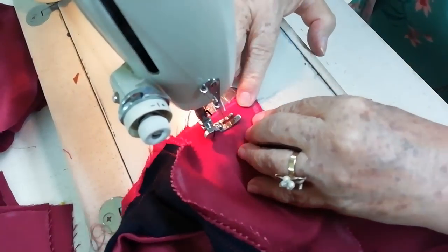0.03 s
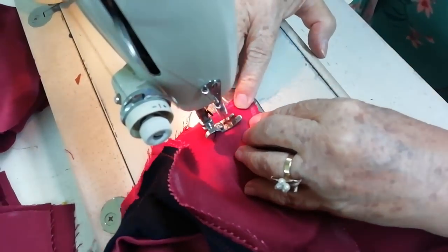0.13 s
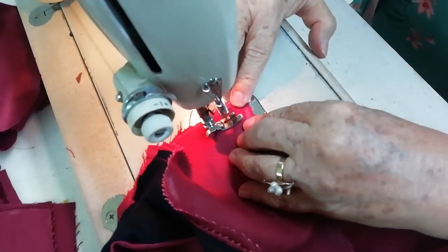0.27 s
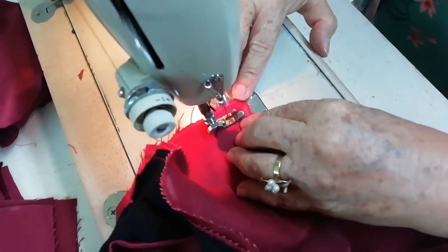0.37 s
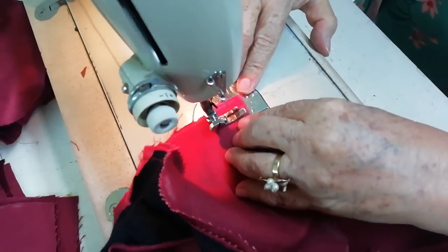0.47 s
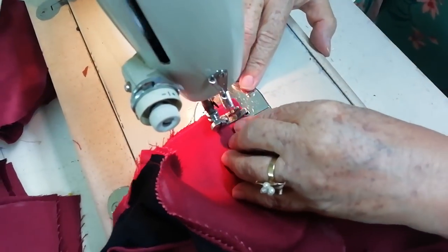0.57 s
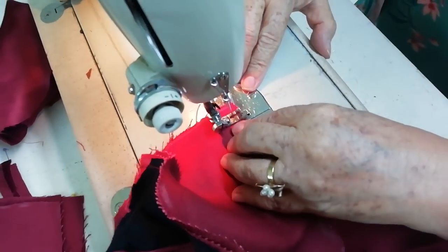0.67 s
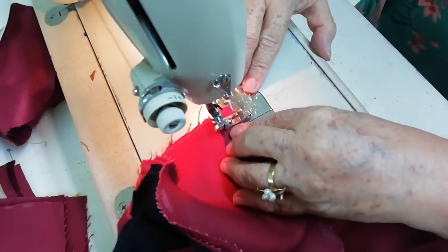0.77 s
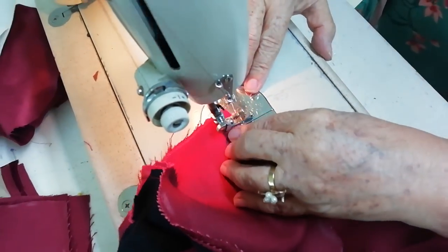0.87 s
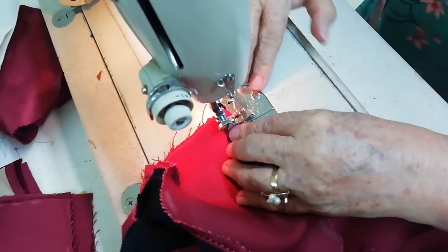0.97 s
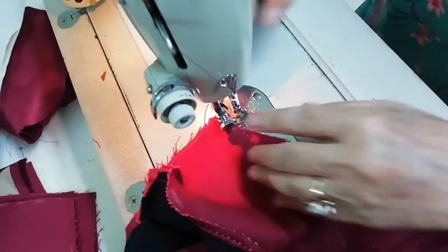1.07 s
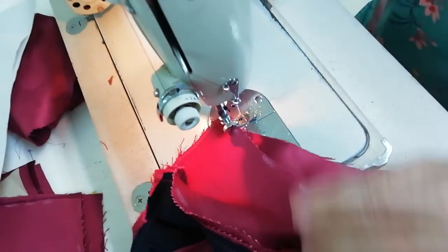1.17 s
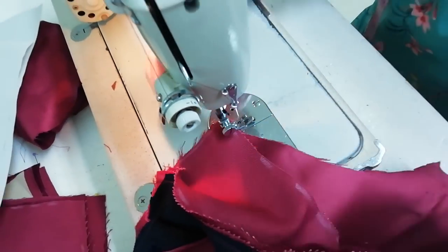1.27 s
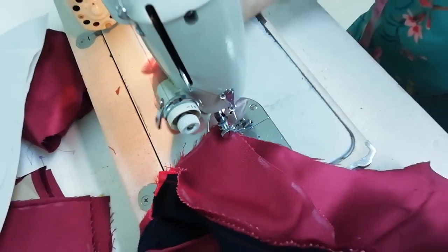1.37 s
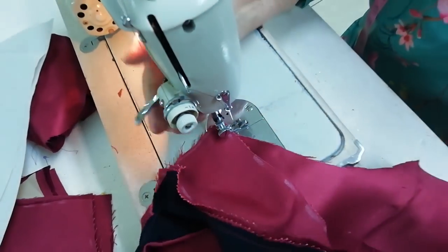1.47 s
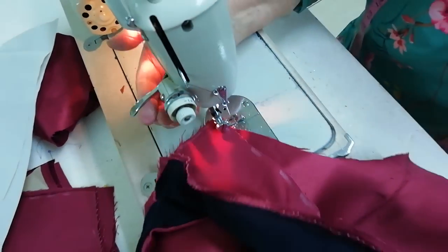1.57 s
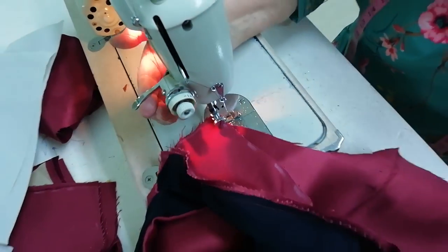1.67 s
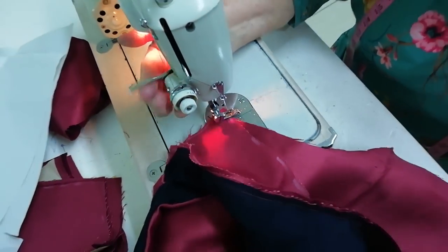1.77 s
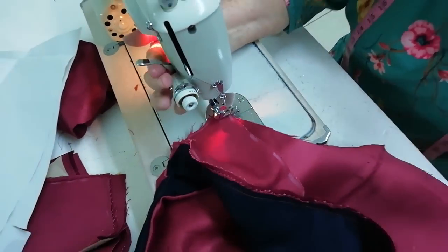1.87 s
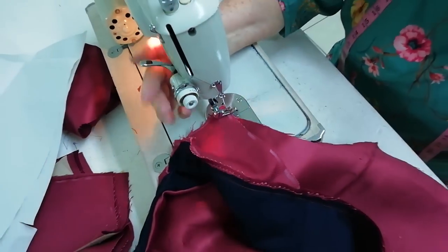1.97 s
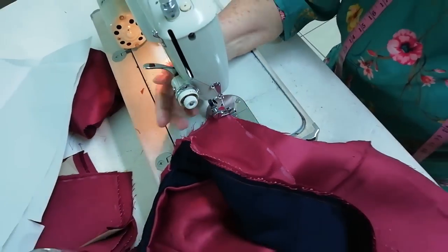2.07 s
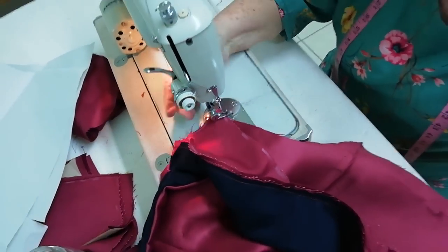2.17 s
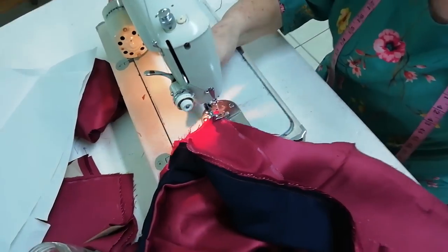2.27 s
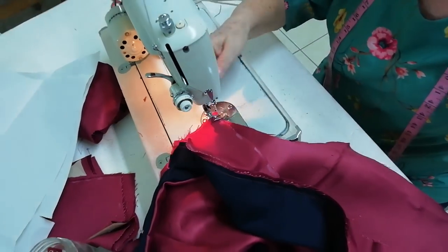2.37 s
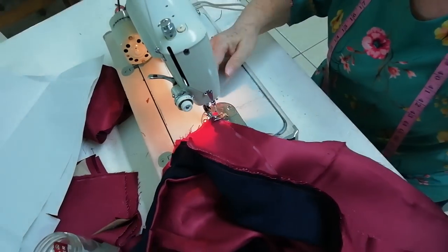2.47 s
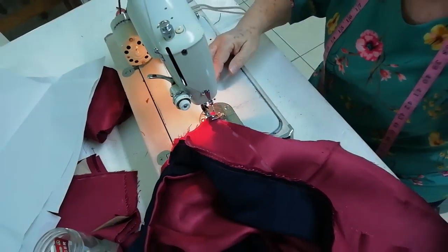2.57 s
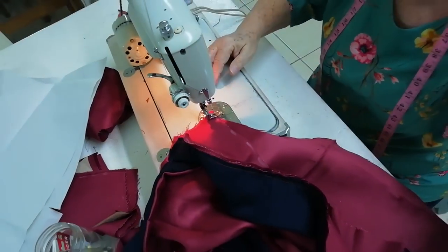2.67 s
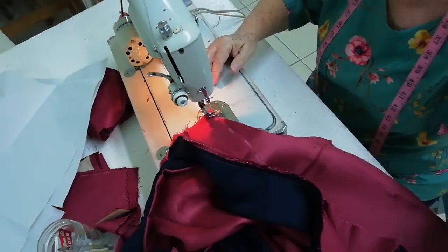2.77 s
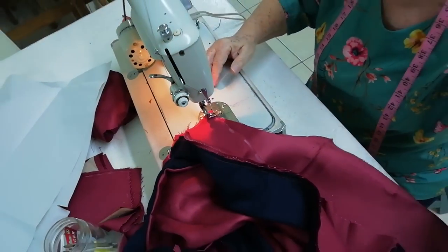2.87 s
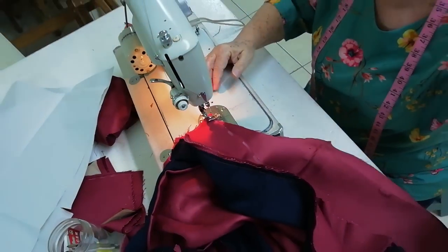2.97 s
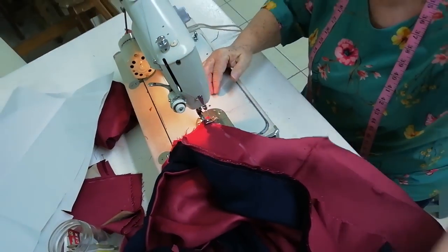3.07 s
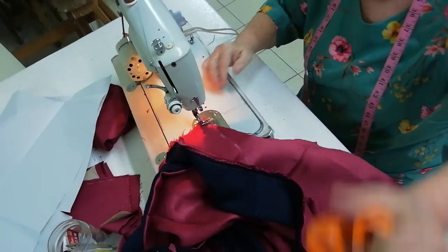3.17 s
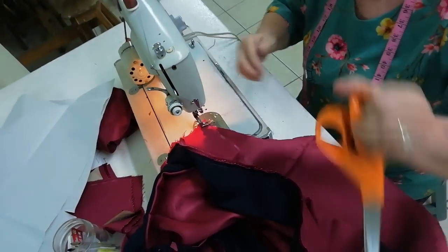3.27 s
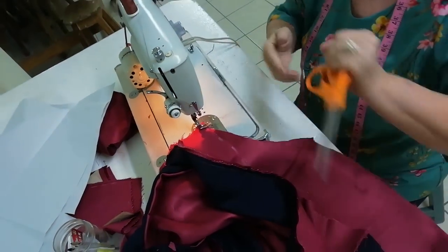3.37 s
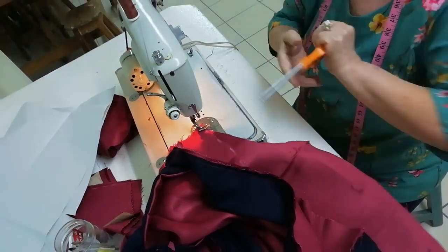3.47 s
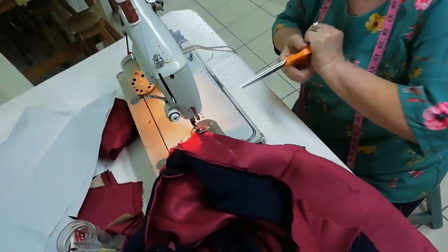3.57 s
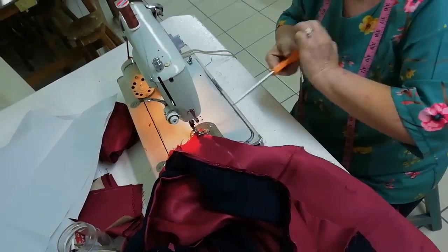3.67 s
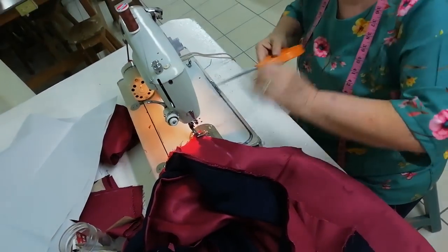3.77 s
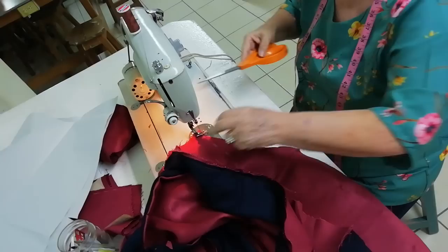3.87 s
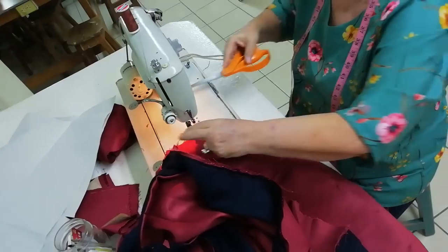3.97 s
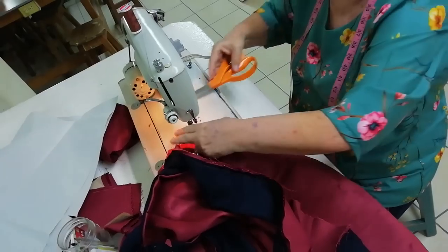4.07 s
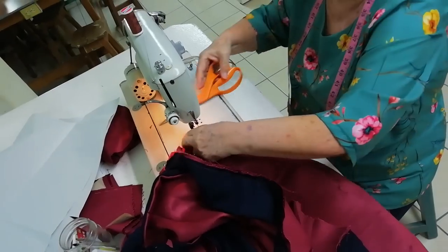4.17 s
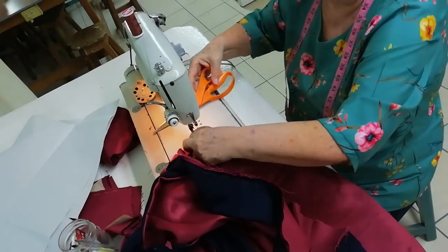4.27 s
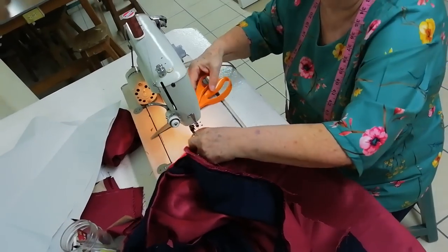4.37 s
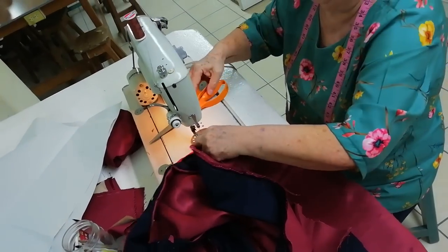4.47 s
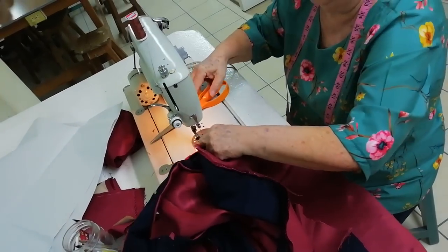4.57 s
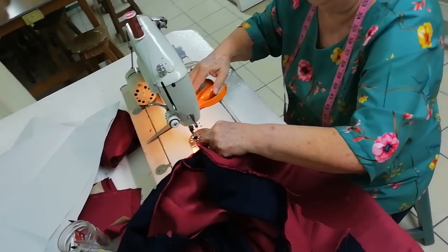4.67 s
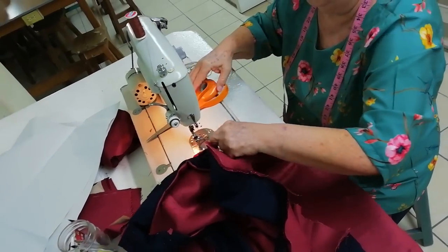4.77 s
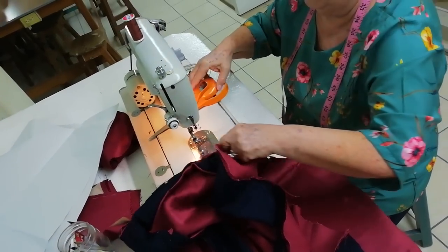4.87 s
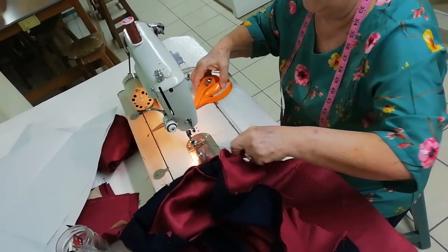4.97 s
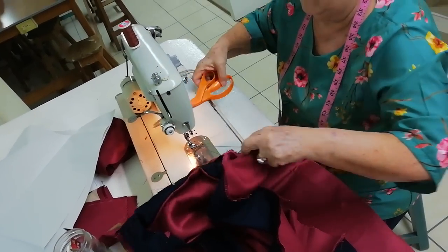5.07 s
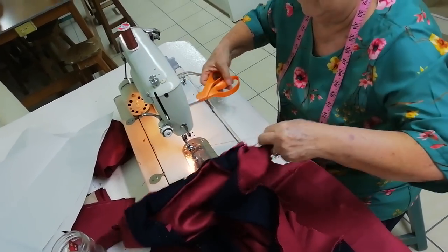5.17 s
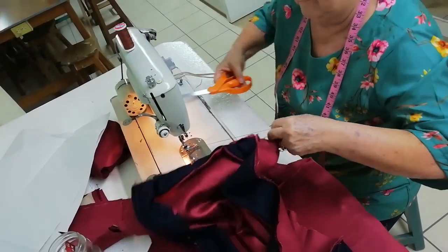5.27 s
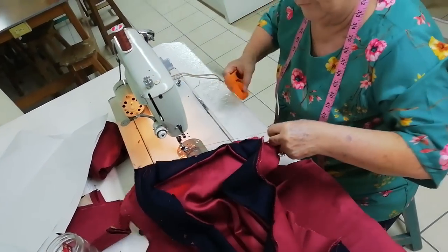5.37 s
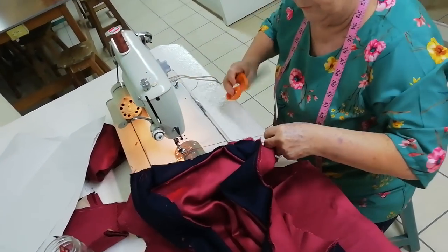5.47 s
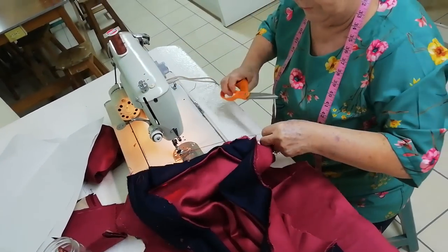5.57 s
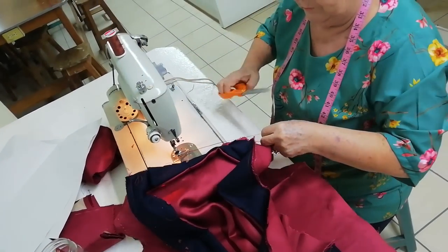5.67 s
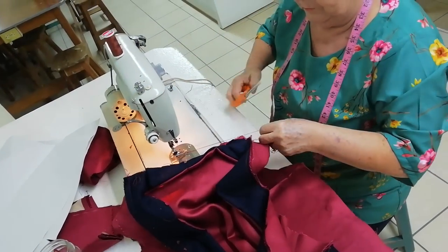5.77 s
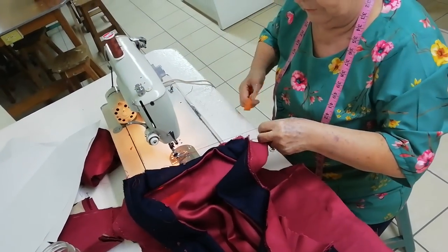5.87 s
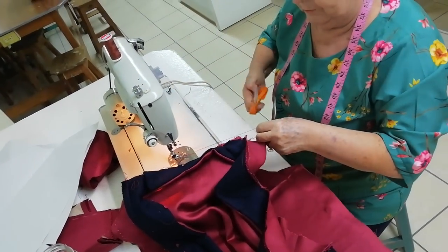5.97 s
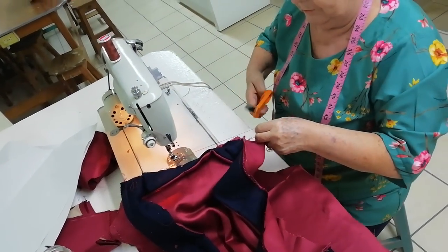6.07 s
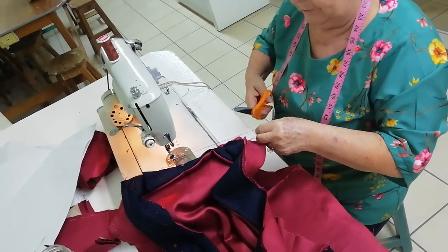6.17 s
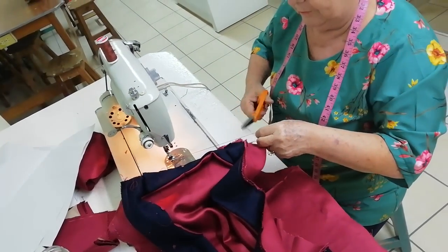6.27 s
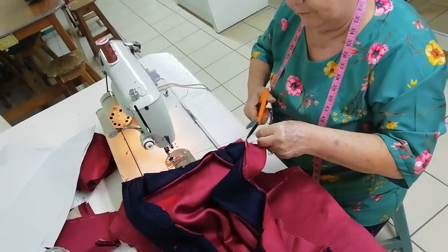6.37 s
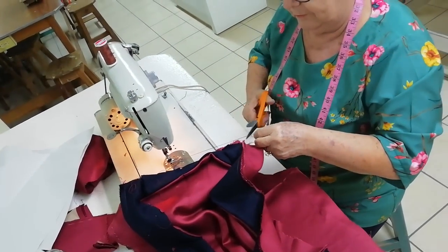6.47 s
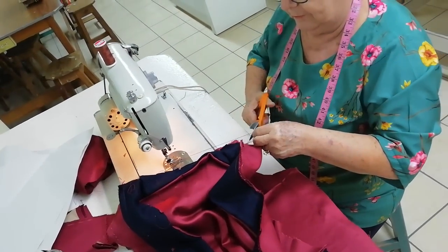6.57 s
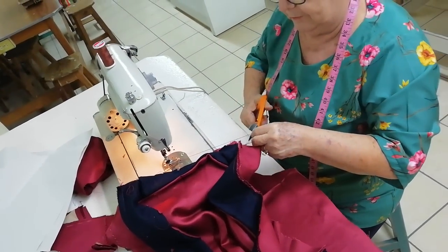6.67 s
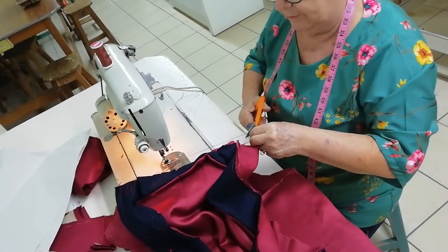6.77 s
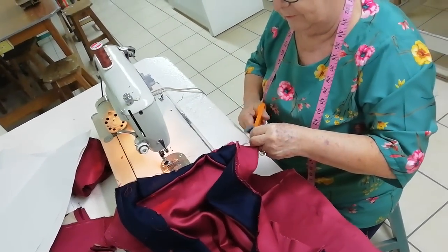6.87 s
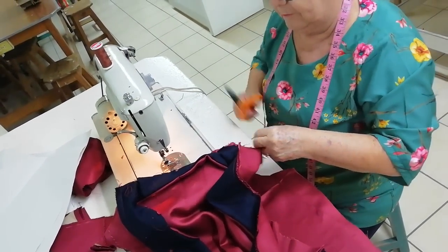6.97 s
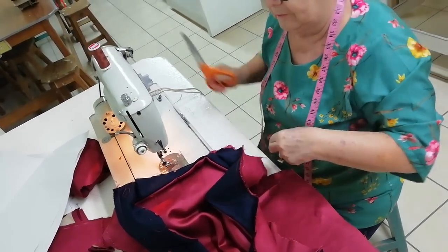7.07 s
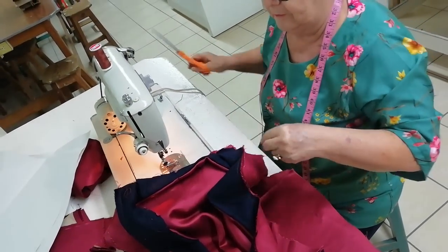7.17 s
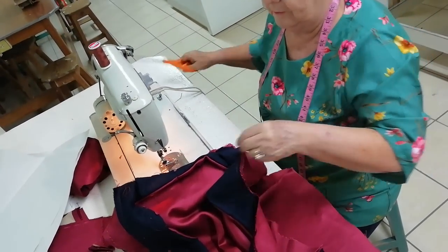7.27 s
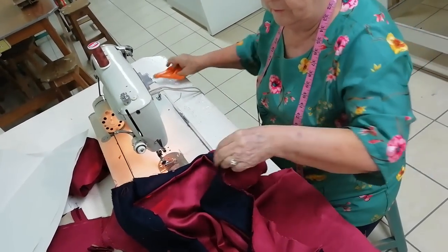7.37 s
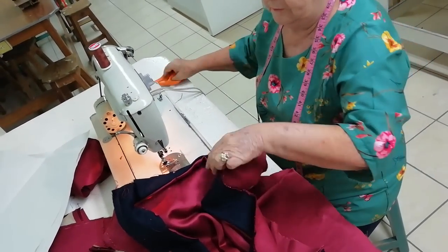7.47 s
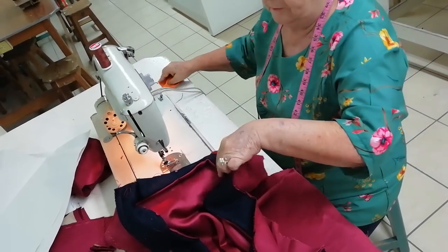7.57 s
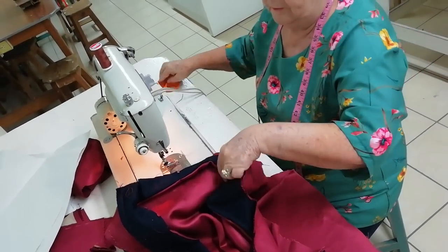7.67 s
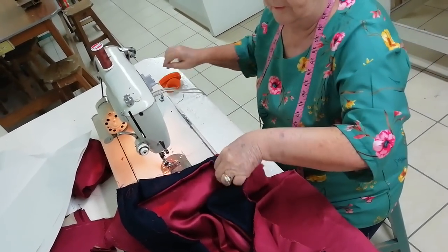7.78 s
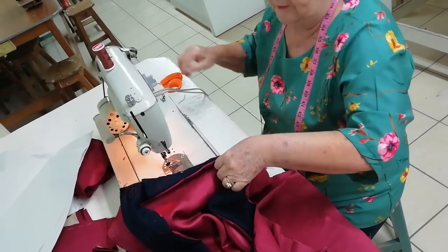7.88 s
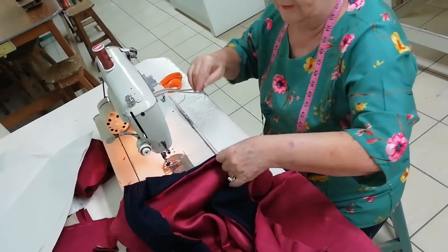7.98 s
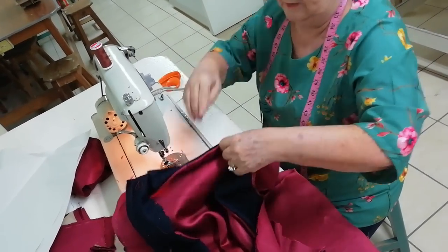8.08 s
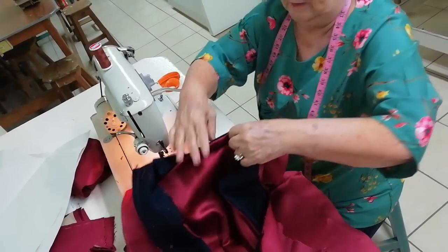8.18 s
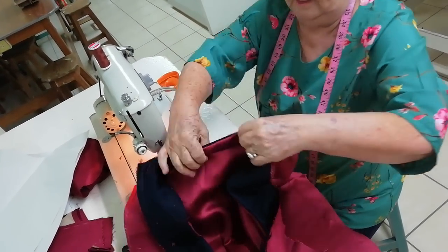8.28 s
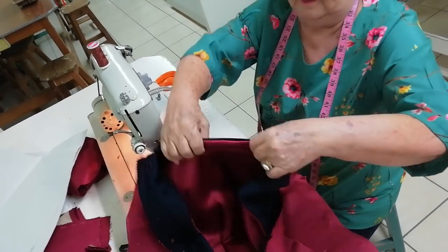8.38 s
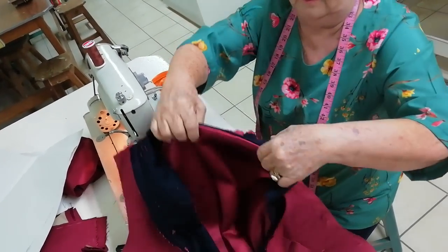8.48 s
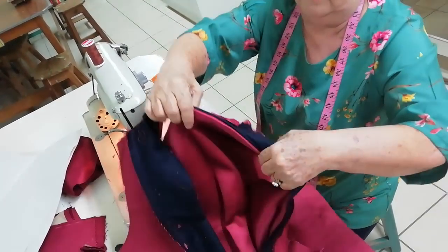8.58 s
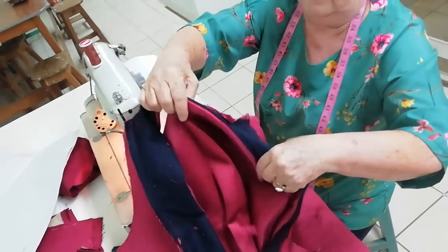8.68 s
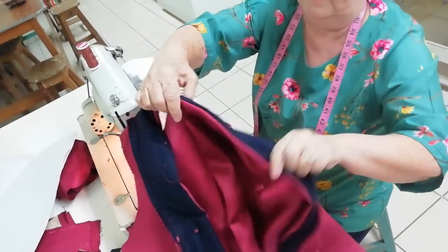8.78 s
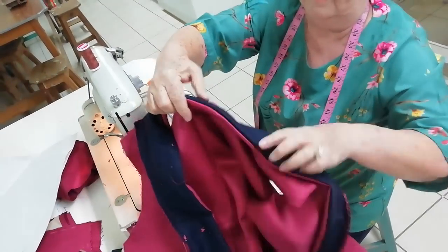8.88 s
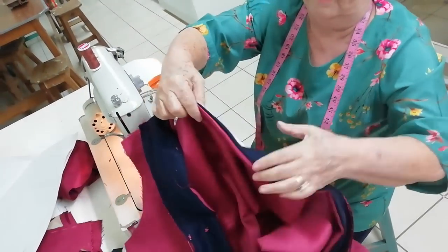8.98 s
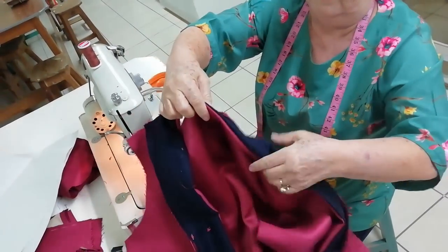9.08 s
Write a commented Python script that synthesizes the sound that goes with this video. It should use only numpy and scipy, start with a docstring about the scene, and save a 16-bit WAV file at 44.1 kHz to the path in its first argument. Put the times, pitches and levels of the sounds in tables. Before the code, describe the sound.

Fast mechanical stitching slows to a halt, followed by metallic lever clunks, cloth rustles, sharp scissor snips and a hard plastic clatter.

```python
"""A sewing machine stitches on a wooden table, slows and stops: contacts and thumps repeat each shaft turn.
Levers clack, scissors snip and are laid down: noise bursts ring metal, plastic and wood. A spring pings.
Cloth rustles and thread is cut: dense ticks in gusts. A tiled room rings after each blow: decaying noise.
Beneath lie hiss, a wavering low hum with swells and a faint tone. The right port faces the work;
the left one hears the treble later and weaker."""
import sys
import numpy as np
from scipy import signal
from scipy.fft import rfft, irfft, next_fast_len
from scipy.io import wavfile
from scipy.ndimage import uniform_filter1d

SR = 44100
rng = np.random.default_rng(int(sys.argv[2]) if len(sys.argv) > 2 else 0)


def store_wav(level_fs):
    """Save 16-bit WAV to argv[1]."""
    pcm = np.round(np.clip(np.atleast_2d(level_fs), -1, 1) * 32767)
    wavfile.write(sys.argv[1], SR, pcm.T.astype(np.int16))


N = 403134
T = np.arange(N) / SR

# colour bands of a contact: low_hz, high_hz
BANDS = [(700, 1800), (1800, 3300), (3300, 6000), (6000, 11000), (11000, 15500)]
BAND_FILTERS = [signal.butter(3, edges, "band", fs=SR, output="sos") for edges in BANDS]
# left port over right: freq_hz, level_db
LEFT_OVER_RIGHT = [(300, 0.5), (520, -7), (750, -11), (1300, -14), (2400, -28.5), (4400, -21.5),
                   (8100, -19.5), (15000, -6.5)]
# wooden table modes: freq_hz, width_hz, level_db
TABLE_MODES = [(107, 28, -4), (147.4, 12, -4), (180.6, 23.6, -1), (234.2, 16, -1.5), (275, 30, -4),
               (325, 42, -1.5), (400, 58, -12), (487, 98, -7), (640, 160, -4)]
# scissor blade modes: freq_hz, width_hz, level_db
BLADE_MODES = [(2260, 220, -9), (3910, 280, -8), (4740, 200, -16), (5960, 120, -9), (8320, 730, -4.5),
               (10900, 66, -8)]


def undb(db):
    """Decibels to amplitude ratio."""
    return 10 ** (np.asarray(db) / 20)


def level(x, db):
    """Scale to an RMS level."""
    return x * undb(db) / np.sqrt(np.mean(x ** 2))


def band(x, lo_hz, hi_hz):
    """Third-order band-pass."""
    return signal.sosfilt(signal.butter(3, [lo_hz, hi_hz], "band", fs=SR, output="sos"), x)


def read(points, hz):
    """Interpolate a table on a log-frequency axis."""
    f, v = np.transpose(points)
    return np.interp(np.log(hz + 1), np.log(f), v)


def colour(x, points, lag_s=0):
    """Shape by (freq_hz, level_db); a lag applies in full to the treble, in part to the bass."""
    bass_lag_share, split_hz = .55, 480
    size = next_fast_len(x.shape[-1])
    hz = np.arange(size // 2 + 1) * SR / size
    lag_share = bass_lag_share + (1 - bass_lag_share) * hz ** 4 / (hz ** 4 + split_hz ** 4)
    response = undb(read(points, hz)) * np.exp(-2j * np.pi * hz * lag_s * lag_share)
    return irfft(rfft(x, size) * response, size)[..., :x.shape[-1]]


def ring(x, modes, order=1):
    """Resonances of a body; a higher order leaves deeper valleys."""
    out = 0
    for hz, width_hz, db in modes:
        mode = x
        for _ in range(order):
            mode = signal.lfilter(*signal.iirpeak(hz, hz / width_hz / order, SR), mode)
        out = out + undb(db) * mode
    return out


def walk(rate_hz, size=N):
    """Slow smoothed random drift, spread near 1."""
    k = int(SR / rate_hz)
    steps = np.repeat(rng.standard_normal(size // k + 1), k)
    return 1.3 * uniform_filter1d(uniform_filter1d(steps, k), k)[:size]


def burst(contact_ms, size=5000, rise_ms=0.69):
    """Noise of a contact: quick rise, then a decay to 1/e in a third of the contact time."""
    ms = np.arange(size) * 1000 / SR
    decay = np.exp(-ms * 3 / max(contact_ms, 1))
    return rng.standard_normal(size) * decay * (1 - np.exp(-ms / rise_ms))


def tint(x, bands_db):
    """Give each band its own level, evened for bandwidth."""
    out = 0
    for db, (lo_hz, hi_hz), sos in zip(bands_db, BANDS, BAND_FILTERS):
        out = out + undb(db) * np.sqrt(SR / 2 / (hi_hz - lo_hz)) * signal.sosfilt(sos, x)
    return out


def apart(hz):
    """Mixing matrix for two noises, alike in the bass and unrelated in the treble."""
    share = np.clip(0.024 + (hz / 600) ** 2, 0, 1)
    return np.array([[np.sqrt(1 - share), np.sqrt(share)], [1, 0]])


def swell(start_s, top_s, end_s, db, bend):
    """A gesture grows from nothing to its top and dies away."""
    out, span = np.zeros(N), slice(max(int(start_s * SR), 0), int(end_s * SR))
    out[span] = undb(db) * np.interp(T[span], [start_s, top_s, end_s], [0, 1, 0]) ** bend
    return out


def floor():
    """Steady room noise in half-octave bands, each wavering on its own."""
    # freq_hz, density_db (relative)
    floor_shape = [(41, -48.5), (70, -9.5), (118, 3), (169, -6.5), (236, -4.5), (339, -12), (544, -21),
                   (914, -13.5), (1370, -19.5), (2250, -21.5), (4530, -27.5), (6210, -35), (8710, -27.5),
                   (10700, -40), (15300, -43.5)]
    floor_db, waver_db = -50, 1.1
    out = 0
    for hz in 85 * 2 ** np.arange(0, 7.6, .5):
        waver = undb(waver_db * walk(9.4))
        out = out + waver * (apart(hz) @ band(rng.standard_normal((2, N)), hz / 1.213, hz * 1.178))
    out = level(colour(out, floor_shape), floor_db)
    out[0] = colour(out[0], [(hz, 0.2 * db) for hz, db in LEFT_OVER_RIGHT])
    return out


def hum():
    """A low tone of wandering pitch with narrow noise, in swells, over a deeper noise rumble."""
    # start_s, top_s, end_s, level_db
    hum_swells = [(-.3, 0.804, 1.35, -47), (1.2, 2.26, 2.8, -57), (6.97, 7.2, 9.2, -56),
                  (8.0, 8.142, 9.1, -54.5), (8.36, 8.61, 9.7, -41)]
    hum_hz, wander_hz, steady_db, rumble_db = 56.3, 2.4, -58, -62
    deep = apart(40) @ rng.standard_normal((2, N))
    tone = 1.4 * np.sin(2 * np.pi * np.cumsum(hum_hz + wander_hz * walk(12)) / SR)
    body = tone + level(band(deep, 42, 60), -8.0)
    gain = undb(steady_db) + sum(swell(*rise, bend=3.0) for rise in hum_swells)
    return body * gain + level(band(deep, 16, 44), rumble_db)


def whistle():
    """Faint thin sine tones of wavering level with softened ends."""
    # start_s, end_s, pitch_hz, level_db
    whistles = [(6.434, 6.66, 2230, -65), (8.404, 9.054, 2220, -71)]
    out = 0
    for start_s, end_s, hz, db in whistles:
        gate = uniform_filter1d(1. * ((T > start_s) & (T < end_s)), 1500)
        out = out + undb(db + 2 * walk(25)) * gate * np.sin(2 * np.pi * hz * T)
    return out


def room(x):
    """Hard walls: a dense tail per port, duller with time, stepping down after strong early echoes."""
    # freq_hz, t60_s (before the step down)
    room_t60 = [(150, 2), (1000, 1.14), (3000, 1.21), (8000, 0.81), (12000, 0.18)]
    knee_s, onset_s, echo_grain_db = 0.29, 0.003, 2.2
    t, tail = T[:SR], 0
    for hz in 90 * 2 ** np.arange(0, 7.3, .5):
        fall_db = -60 * t / read(room_t60, hz) - np.minimum(8 * (t / knee_s) ** 3, 9)
        fall_db = fall_db + echo_grain_db * walk(92.8, size=SR)  # single echoes stand out of the wash
        tail = tail + apart(hz) @ band(rng.standard_normal((2, SR)), hz / 1.24, hz * 1.174) * undb(fall_db)
    tail = tail * np.clip(t / onset_s, 0, 1)
    tail[0] = colour(tail[0], [(hz, 0.29 * db) for hz, db in LEFT_OVER_RIGHT])
    return signal.fftconvolve(x[None], tail / np.sqrt(np.sum(tail[1] ** 2)), axes=1)[:, :N]


def fibre_ticks():
    """Slipping fibres: dense tiny ticks of uneven strength."""
    grain_db = 2.1
    return rng.standard_normal(N) * undb(grain_db * rng.exponential(size=N) + 1.5 * walk(60))


def cloth(ticks):
    """Cloth dragged and handled: fibre ticks in gusts, treble and middle mixed per gesture."""
    # start_s, top_s, end_s, treble_db, middle_over_treble_db
    rustles = [(1.0, 1.284, 1.55, -55, 5), (1.7, 1.87, 1.93, -53, -8), (2.8, 3.176, 8.2, -60, 9),
               (3.2, 3.26, 3.34, -55, 0), (3.69, 3.712, 3.8, -58, 0), (4.5, 4.99, 5.4, -53, -4),
               (4.98, 5.15, 5.19, -44, 13.5), (8.2, 8.63, 8.8, -58, 0), (8.75, 8.93, 9.1, -56, 0)]
    treble, middle = level(band(ticks, 4140, 9370), -7.5), level(band(ticks, 1400, 6800), -19)
    return sum(swell(*move, bend=1.84) * (treble + undb(middle_db) * middle)
               for *move, middle_db in rustles)


def cutting(ticks):
    """Blades slide through thread: fibre ticks ring the steel, one note above the rest."""
    # start_s, top_s, end_s, level_db, note_hz, note_over_slide_db
    cuts = [(4.544, 4.7, 4.8, -59, 8100, 0), (4.8, 4.97, 5.06, -56, 11000, 2),
            (5.03, 5.09, 5.14, -54, 3950, 7), (5.09, 5.14, 5.18, -48, 4850, 1),
            (5.07, 5.15, 5.2, -58, 2250, 6), (5.05, 5.13, 5.2, -58, 11000, 6),
            (5.15, 5.24, 5.35, -53, 11000, 1), (6.42, 6.45, 6.5, -58, 2240, -6),
            (6.95, 6.966, 6.985, -65, 8400, 3), (6.993, 7.009, 7.026, -47, 8300, -8),
            (7.03, 7.045, 7.11, -61, 3350, -3)]
    hiss_db, note_width_share = -5, .015
    scrape = ticks * undb(3.0 * walk(40))
    steel = level(ring(scrape, BLADE_MODES), -2.0) + level(band(scrape, 2800, 11500), hiss_db)
    out = 0
    for *cut, hz, db in cuts:
        note = level(ring(scrape, [(hz, note_width_share * hz, 0)]), db)
        out = out + swell(*cut, bend=1.3) * (steel + note)
    return out


def spring():
    """A small steel spring pings as a lever snaps: one thin high mode, wavering as it dies away."""
    # start_s, level_db
    spring_pings = [(1.412, -40), (1.592, -45)]
    pitch_hz, t60_s = 12850, .2
    pings = sum(undb(db - 60 * np.minimum(np.abs(T - s), 1) / t60_s) * (T > s) for s, db in spring_pings)
    return pings * undb(3.0 * walk(150)) * np.sin(2 * np.pi * pitch_hz * T)


def blows(table, modes, colour_db, crack_db, wood):
    """Blow hardness tilts the object's colour; part, body and table ring. Returns direct and room feed."""
    # place of each band on the colour slope, octaves; the lowest band follows the knock
    band_octaves = np.array([0, -.45, .45, 1.3, 1.3])
    crack_db_per_slope = 0.785  # a brighter contact cracks more
    note_width_hz, note_room_db = 95, -10.5
    thump_late_s, push_samples = .004, 60
    soft = np.r_[np.zeros(int(thump_late_s * SR)), np.hanning(push_samples)]
    out = np.zeros((2, N))
    for s, db, slope_db, knock_db, ms, thump_db, room_db, *notes in table:
        near = burst(ms)
        # the room feed is an impulse of the burst's energy, at the room level
        far = np.linalg.norm(near) * undb(room_db) * (np.arange(len(near)) == 0)
        crack = tint(np.array([near, far]), colour_db + slope_db * band_octaves + knock_db * (band_octaves == 0))
        bare = undb(crack_db + crack_db_per_slope * slope_db) * crack
        body = undb(1.0) * ring(crack, modes, order=2)
        # one soft push into the wood
        push = signal.lfilter(soft / soft.sum(), 1, far) * np.array([[undb(-room_db)], [1]])
        thump = undb(thump_db) * ring(push, wood)
        tap = far * np.array([[undb(-room_db)], [undb(note_room_db)]])
        tap = tap * np.sqrt(SR / (2 * np.pi) / note_width_hz)
        note_modes = [(hz, note_width_hz, note_db) for hz, note_db in zip(notes[::2], notes[1::2])]
        own = ring(tap, note_modes, order=2)
        i = int(s * SR)
        out[:, i:i + len(near)] += undb(db) * (bare + own + body + thump)
    return out


def laying_down():
    """Scissors laid down: blows that ring the plastic handles and the table."""
    # start_s, level_db, slope_db_per_octave, knock_db, contact_ms, thump_over_level_db, room_over_level_db,
    # then note_hz, note_db pairs of the struck part
    laid_blows = [(4.304, -14, 7.5, -3, 5.45, 4, -9, 350, -11, 1800, -14, 2950, -17, 1077, -6, 4350, -10),
                  (4.39, -15, 8, -8, 5, 4, -9.5, 3050, -13, 5230, -10),
                  (4.397, -28, 0, 0, 8, 5, -5, 1100, -12), (4.413, -30, 0, 0, 8, 7, -5, 340, -3),
                  (4.435, -31, 0, 3, 8, 5, -5, 350, -3, 1100, -6),
                  (7.666, -12.5, 3.5, 2, 8, -4, -2.5, 990, -6, 2200, -11, 2720, -10),
                  (7.674, -17, -13, 7, 12, 9, 1, 850, -8, 1000, -6, 1370, -8),
                  (7.695, -24, -6, 5, 10, 9, 0, 950, -3),
                  (7.72, 1, 4, -19, 4.5, -8, -2, 1916, -13, 2713, -17, 3900, -13),
                  (7.729, -14, 0, -5, 6, 0, -5, 3800, -11, 1300, -8),
                  (7.779, -17, 0, -0.5, 9.3, 9, 0, 1884, -9, 2315, -9),
                  (7.79, -18, 0, 0, 9, 9, -3, 1370, -10),
                  (7.905, -22, 0, 0, 12, -4, -4, 1335, -11, 1900, -12),
                  (8.1, -40, -4, 5, 20, 0, 0, 1300, -10)]
    # plastic handle modes: freq_hz, width_hz, level_db
    handle_modes = [(1010, 480, 1), (1370, 160, -4), (1920, 360, 4), (2480, 500, 2), (4150, 700, -6.5),
                    (4850, 720, -12)]
    # plain contact: level_db per band
    handle_colour = (-14.5, -14, -12, -19, -50)
    return blows(laid_blows, handle_modes, handle_colour, -4.5, TABLE_MODES[1:])


def snips():
    """Scissor contacts: blows that ring the blades and the table."""
    # start_s, level_db, slope_db_per_octave, knock_db, contact_ms, thump_over_level_db, room_over_level_db,
    # then note_hz, note_db pairs of the struck part
    scissor_blows = [(4.508, -27.5, -9, 7, 35, -1, -4, 3350, -20),
                     (4.752, -13.5, -6, 2, 12, -27, -10, 2455, -20, 4005, -14),
                     (4.764, -12.5, -6, 4, 12.6, -4, -6.5, 1100, -22, 3900, -21),
                     (4.777, -21, -4.5, 8, 7.1, 3, -5), (4.968, -32.5, -4, 0, 12, -2, 6.5),
                     (5.138, -38, 3, 0, 12, 0, -5, 4850, -12),
                     (5.152, -28, 5, 8, 8.4, 3, -2.5, 2500, -12, 8470, -8),
                     (5.339, -6.5, 3, -34, 8, -42, -8.5, 6500, -15, 8410, -10),
                     (6.128, -54, 3.5, 4, 11, 2.5, -12), (6.16, -60, 10.5, .1, 10.2, 5, -10),
                     (6.274, -54, 6, 3, 11, 1.1, -14), (6.304, -61, 11, 8, 9.3, 3, -15),
                     (6.426, -50, 4, 1, 10.5, 6, 3), (6.439, -55, 8, -1.1, 11, 9, -3),
                     (6.455, -57.5, 11, -4, 15, .1, -28), (6.966, -59, 8.5, 17, 8.5, .1, 0),
                     (6.997, -46, 4, -1, 12, -7, -9), (7.021, -56, 10, 0, 6, 0, -15),
                     (7.042, -38, -6, 5, 14, 6, -8), (7.09, -49, -6, 5, 12, 14, -13)]
    # plain contact: level_db per band
    blade_colour = (-23.5, -17, -10, -12, -35)
    return blows(scissor_blows, BLADE_MODES, blade_colour, -3, TABLE_MODES[2:])


def levers():
    """Machine levers clack: blows that ring the cast arm and all modes of the table."""
    # start_s, level_db, slope_db_per_octave, knock_db, contact_ms, thump_over_level_db, room_over_level_db,
    # then note_hz, note_db pairs of the struck part
    lever_blows = [(1.095, -21, 3, -1, 9.2, 1, -21), (1.12, -22, 3, -23, 30, 4, -17),
                   (1.237, -23, 3.5, -6, 11, -7, -15), (1.292, -39, 2, 8.5, 14, -5.5, -11),
                   (1.411, -12.5, 2.5, -13, 12, -19.5, -17, 1970, -17, 5090, -16, 12900, -23),
                   (1.471, -26.5, 0.5, -14, 7, -2, -22, 1970, -20), (1.482, -30, 2, -14, 5, -5, -22),
                   (1.59, -21, 6, -18, 15, -18, -19.5, 4110, -12, 12900, -15),
                   (1.631, -18.5, -4, -5, 18, -1, -14.5, 1790, -16, 3890, -16),
                   (1.796, -43, -1.5, 6, 23, 6, -5), (1.836, -28, -3.5, -5, 14, -6, -7),
                   (1.899, -14.5, 4.5, -10, 9, -17, -30, 1010, -10),
                   (1.907, -20, 4.5, -8, 16, -14, -30, 1010, -8, 12900, -20),
                   (1.942, -5, 2, -3, 12, -4, -10, 270, -18, 1400, -11, 1750, -13, 2315, -14, 4565, -17),
                   (2.165, -38, 6, 11.5, 8.1, 22.5, 3.5), (2.215, -16, -10, 4.5, 22, 5, -1.1),
                   (2.226, -3.5, -5, 0, 12, -8, -2, 620, -19, 1170, -16, 2250, -17, 2690, -16, 4200, -18, 4800, -19),
                   (2.578, -18.5, -4.5, 5.5, 7.9, 2, -1, 1090, -20, 2050, -22),
                   (2.651, -44.5, 2, -6, 22, 22, -7, 300, 8), (2.674, -43, 3.5, 9, 6, 20, 4, 280, 11),
                   (2.748, -19, -2.5, 2, 22, -4, 4.5, 400, -14, 620, -19, 1150, -15, 2000, -16, 2660, -13, 4150, -17),
                   (2.776, -18.5, -12, -22.5, 27, -9, 1.5, 2400, -16),
                   (2.89, -38, 0, 5, 18, -5, -3, 1110, 4), (2.901, -40, 0, 0, 12, -5, -3, 1110, 6),
                   (2.913, -38, .1, 5, 21, -5, -3.5, 1110, 5), (2.945, -39, 6, 0, 5, 0, -12),
                   (3.14, -41, 5, 5, 8, 17, -8), (3.155, -36, 6, 7, 5, 24, -2.5)]
    # cast arm modes: freq_hz, width_hz, level_db
    arm_modes = [(1310, 220, -9.5), (2040, 460, -10.5), (2575, 290, -6.5), (4100, 700, -11),
                 (7100, 470, -22), (8400, 150, -24)]
    # plain contact: level_db per band
    arm_colour = (-17, -16, -13, -11.5, -37)
    return blows(lever_blows, arm_modes, arm_colour, -4, TABLE_MODES)


def machine():
    """Each shaft turn repeats its contacts, jittered in time and level, and thumps, jittered in level."""
    # stitching levels: time_s, rattle_db, thump_db
    run_levels = [(0, -27.5, -40), (.5, -29, -42), (.93, -28.5, -40), (1.002, -31, -52.5), (1.06, -44, -52),
                  (1.15, -38, -51), (1.2, -60, -56), (1.348, -56, -67)]
    # shaft speed: time_s, stitches_per_s
    shaft_speed = [(0, 13.36), (.89, 13.36), (.99, 9.5), (1.35, 4)]
    # contacts in a turn: turn_share, level_db, slope_db_per_octave, contact_ms
    turn_contacts = [(.862, 3, 1, 22), (.93, -1.5, -1, 13), (0.025, 6, 3.5, 8), (0.081, 3.5, 4.5, 7.9),
                     (.131, 0.5, 1, 13.8), (.17, 5.5, 2, 8), (0.245, 7, 4.5, 4), (.29, 3, 2, 7),
                     (.339, 2, 3, 8.9), (.40, 2, 1, 8), (.479, -7, -4, 9.4), (.555, -7.5, -6, 17),
                     (.691, -15, -6.5, 17)]
    # thumps into the table in a turn: turn_share, level_db
    turn_thumps = [(.76, 3), (.46, 0), (.58, 2), (.68, -1), (.93, -5), (.27, 0)]
    # place of each band on a contact's slope: octaves
    turn_octaves = np.array([-1.5, -.45, .45, 1.3])
    # bobbin hook and feed part modes: freq_hz, width_hz, level_db
    hook_modes = [(842, 260, -2), (1450, 160, -5), (2116, 300, -1.5), (2770, 360, -.5), (4190, 240, -4.5),
                  (6400, 200, -21), (8620, 400, 0), (9050, 300, 1)]
    # machine bed modes: freq_hz, width_hz, level_db
    bed_modes = [(82.4, 30, -14.5), (132.3, 20, -6.5), (184, 29, -6), (243.2, 30, -1.5), (275, 30, -6),
                 (305, 22, .5), (335, 14, -8), (400, 70, -13), (600, 160, -13)]
    scatter_db, slip_turns = 1.5, 0.0053
    chatter_db, chatter_hz = 2.2, 900  # loose parts chatter within each contact
    run_samples = int(1.4 * SR)
    s, *columns = np.transpose(run_levels)
    rattle_db, thump_db = (np.interp(T[:run_samples], s, c) for c in columns)
    turns = np.cumsum(np.interp(T, *np.transpose(shaft_speed))) / SR
    metal, wood = np.zeros((4, N)), np.zeros(N)
    for k in range(17):
        for share, db, slope_db, ms in turn_contacts:
            slip, size = rng.standard_normal(2)
            i = int(SR * np.interp(k + share + slip_turns * slip, turns, T))
            gains = undb(db + slope_db * turn_octaves + scatter_db * size)
            metal[:, i:i + 3000] += gains[:, None] * burst(ms, size=3000, rise_ms=0.5)[:N - i]
        for share, db in turn_thumps:
            wood[int(SR * np.interp(k + share, turns, T))] += undb(db + 2.5 * rng.standard_normal())
    metal = metal[:, :run_samples] * undb(chatter_db * walk(chatter_hz, size=run_samples))
    wood = wood[:run_samples]
    whirr = undb(-12.5) * rng.standard_normal((4, run_samples))  # gears and belt between the contacts
    rattle = sum(band(metal[k] + whirr[k], *BANDS[k]) for k in range(4))
    rattle = rattle + undb(-12.0) * band(metal[3], *BANDS[4])
    rattle = rattle + undb(3) * ring(rattle, hook_modes)
    thump = ring(wood + undb(-27) * rng.standard_normal(run_samples), bed_modes)
    # table levels are relative to the RMS of the first second
    rattle = rattle * undb(rattle_db) / rattle[:SR].std()
    thump = thump * undb(thump_db) / thump[:SR].std()
    return np.pad(rattle + thump, (0, N - run_samples))


def scene():
    """Direct sound at both ports, the room's answer and the background."""
    # microphone response: freq_hz, level_db
    mic_response = [(420, 4.5), (600, -1), (760, 3), (4500, 5), (6500, 2), (8000, 4.5), (9300, 4.5),
                    (10500, -6), (12500, -10.5), (16000, -18.5)]
    left_lag_s, scatter_ms, scatter_db, work_room_db = 26 / SR, 13, 5, -12
    ticks = fibre_ticks()
    work = machine() + cloth(ticks) + cutting(ticks) + spring()
    # only the lever blows stir the lowest modes of the table; scissors skip the lowest two, laid-down blows the
    # lowest one
    near, far = levers() + snips() + laying_down()
    near = colour(near + work, mic_response)
    # sound reaches the left port round the hand and off the table
    echo = band(burst(scatter_ms, size=2000), 1500, 16000)
    left = near + undb(scatter_db) * signal.fftconvolve(near, echo / np.linalg.norm(echo))[:N]
    direct = np.array([colour(left, LEFT_OVER_RIGHT, left_lag_s), near])
    reverb = room(colour(far + undb(work_room_db) * work, mic_response))
    return undb(6.0) * (direct + reverb) + floor() + hum() + whistle()


def record(dry):
    """Peaks stop at full scale; the top is cut."""
    top_hz = 15900
    return signal.sosfilt(signal.ellip(8, .2, 70, top_hz, fs=SR, output="sos"), np.clip(dry, -1, 1))


dry = scene()
out = record(dry)
store_wav(out)
```